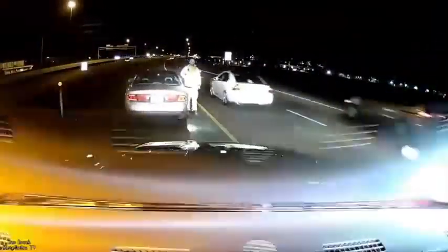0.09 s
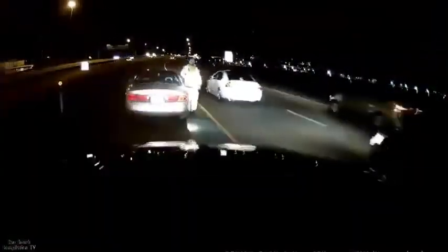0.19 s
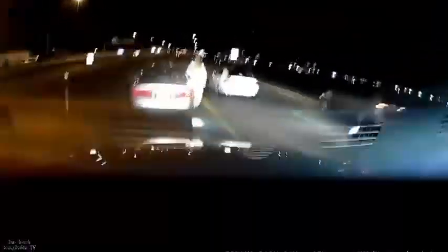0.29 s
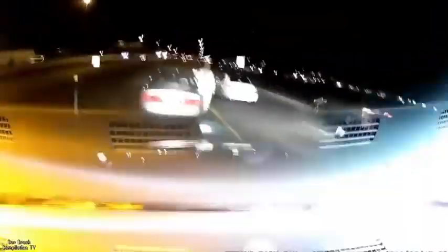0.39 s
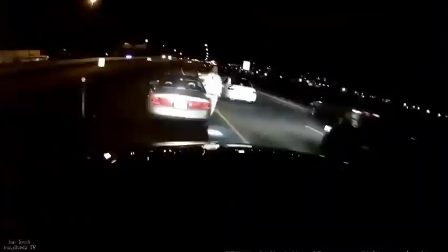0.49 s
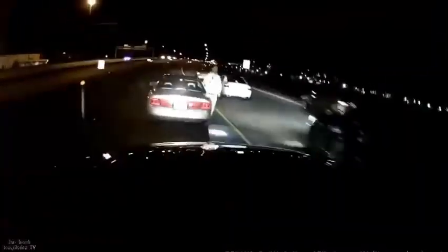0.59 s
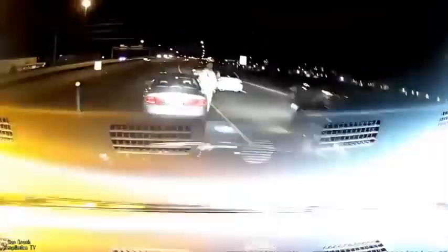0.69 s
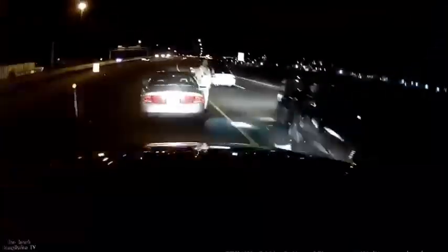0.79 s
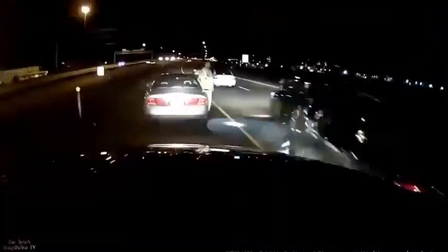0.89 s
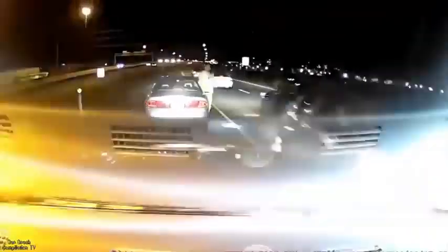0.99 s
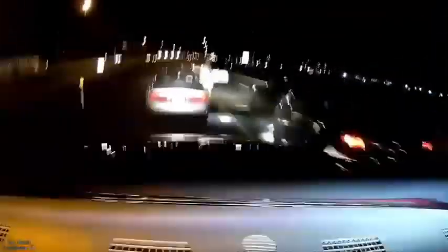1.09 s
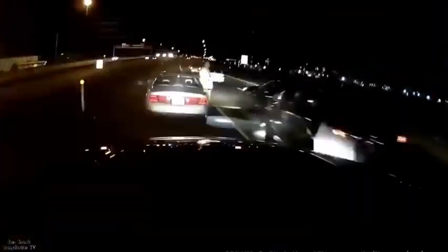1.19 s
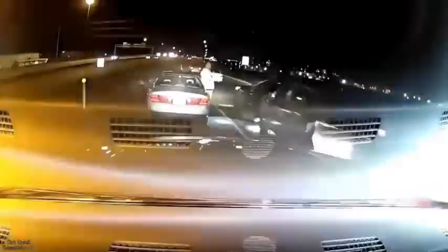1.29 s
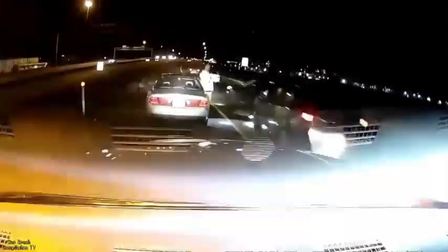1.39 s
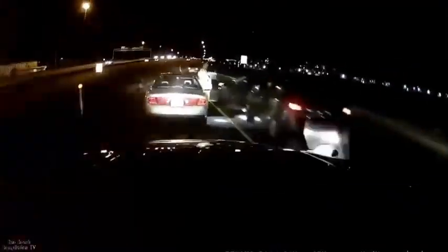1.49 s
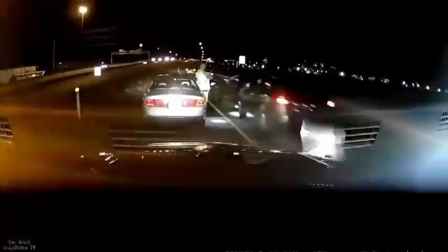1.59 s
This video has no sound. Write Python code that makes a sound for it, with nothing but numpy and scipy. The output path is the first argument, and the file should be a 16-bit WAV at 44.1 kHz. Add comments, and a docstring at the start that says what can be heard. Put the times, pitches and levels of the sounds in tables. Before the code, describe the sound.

A car collision from inside the cabin. Quiet road noise with unsteady hum and faint whine; a short scuff at 0.2 seconds, then a massive, clipped boom and crumpling metal from 0.24 to 0.6, heaviest around 0.4 to 0.5. Faint glass clinks near 0.7, scattered knocks, sharp bright cracks around 0.97 to 1.05, dry clatter until 1.5, and a wavering tyre squeal from 1.3, stronger at 1.54 to the end.

```python
"""Road noise with an unsteady hum and a faint whine is heard first inside a car; then a short scuff begins a collision.
The body booms as filtered noise and pressure pulses, and its panels crumple as dense grains of noise.
Loose parts knock and trim cracks as coloured noise bursts; struck parts and glass chips ring as damped sines.
A tyre squeals late on as a wavering tone with its octave. The loud parts overload the microphone input."""
import sys
import numpy as np
from scipy import signal
from scipy.fft import rfft, irfft, next_fast_len
from scipy.io import wavfile
from scipy.ndimage import map_coordinates

SR = 44100
rng = np.random.default_rng(int(sys.argv[2]) if len(sys.argv) > 2 else 0)


def dump(signal):
    """Clip the signal to [-1, 1] and save it as 16-bit WAV at the path in sys.argv[1]."""
    limited = np.clip(np.atleast_2d(signal).T, -1, 1)
    pcm = np.round(limited * 32767).astype(np.int16)
    wavfile.write(sys.argv[1], SR, pcm)


N = 72765

# Spectrum of the road noise: frequency_hz, gain_db
ROAD_SPECTRUM = [(15, -45), (25, 0.5), (120, -17.5), (185, 0.5), (320, -9.5), (640, -15.5), (734, -11),
                 (887, -11.5), (1500, -13), (2100, -26.5), (2800, -18.5), (3300, -28), (16000, -59.5)]
ROAD_DB, ROAD_FADE_DB_PER_S, ROAD_WOBBLE_DB = -31.5, 1.35, 1.5
HUM_HZ, HUM_DB, HUM_WAVER, HUM_WOBBLE_DB = 725, -45.5, 0.009, 7.1  # waver: fraction of the pitch
WHINE_HZ, WHINE_DB = 7200, -63

# Level of the tyre squeal's fundamental: time_s, level_db
SQUEAL_LEVEL = [(1.24, -69), (1.29, -38), (1.45, -42), (1.52, -42), (1.538, -30.5), (1.65, -32)]
SQUEAL_HZ, OCTAVE_DB = 805, -3
SQUEAL_WAVER, SQUEAL_FLUTTER_DB = 0.009, 1.5  # waver: fraction of the pitch

# First touch of the bumpers: start_s, level_db, hold_s
SCUFFS = [(0.2033, -22, 0.011), (0.215, -26.5, 0.015)]
# Spectrum of the scuff: frequency_hz, gain_db
SCUFF_SPECTRUM = [(290, -37), (500, -6), (622, -23), (766, -14), (1330, 2), (2010, -15), (2510, -9),
                  (6000, -63)]

# Glass chips: start_s, level_db, pitch_hz
GLASS_CLINKS = [(.708, -46, 11600), (.712, -48, 14300), (.725, -44, 10700), (1.57, -43.5, 3170)]
# Ringing of struck parts, low thumps and one higher ring from a crack: start_s, level_db, pitch_hz
STRUCK_RINGS = [(.2425, -7, 273), (.402, 4, 260.4), (.977, -11, 1645), (.92, -16.5, 471),
                (.976, -16.5, 200), (1.088, -14.5, 201.4), (1.095, -19.5, 122), (1.228, -23, 530)]
CLINK_T60_S, STRUCK_T60_S = 0.16, 0.11

# Loose parts knocking, upper mids and treble relative to the peak level:
# start_s, peak_db, ring_hz, upper_mids_db, treble_db, hold_s
LOOSE_KNOCKS = [(0.24, -5.5, 770, -23.5, -49, 0.011), (0.305, -5, 1080, -24.5, -41, 0.012),
                (0.397, 2.5, 1470, -47, -59, 0.039), (0.43, -2.5, 1000, -34, -50, 0.015),
                (0.458, -4, 1350, -37, -52, 0.0099), (0.554, -13.5, 920, -13.5, -34, 0.0066),
                (0.675, -12, 1060, -15.5, -23, 0.015), (0.686, -11.5, 820, -19, -27, 0.023),
                (0.777, -12.5, 1010, -29.5, -37, 0.016), (0.809, -13.5, 900, -20.5, -48, 0.0087),
                (0.889, -27, 2980, -10, -7.5, 0.0072), (0.906, -14, 664, -13.5, -13, 0.0087),
                (0.959, -10.5, 1000, -12.5, -26, 0.0092), (1.003, -16.5, 3160, -5.5, -12, 0.025),
                (1.093, -9, 700, -22.5, -46, 0.0057), (1.144, -20.5, 1540, -9.5, -22, 0.0049),
                (1.158, -8.5, 920, -17.5, -28.5, 0.0087), (1.172, -11.5, 3120, -12, -22.5, 0.0072),
                (1.185, -9, 1770, -12.5, -24.5, 0.012), (1.189, -9, 520, -14, -31, 0.0065),
                (1.208, -14.5, 1670, -14.5, -31, 0.011), (1.247, -12.5, 1720, -15.5, -28, 0.0088),
                (1.265, -15.5, 3600, -7, -21, 0.0012), (1.272, -26, 780, -1, -22, 0.017),
                (1.296, -18.5, 1630, -16, -30, 0.019), (1.349, -9.5, 1470, -16.5, -28, 0.011),
                (1.363, -22.5, 2960, -11.5, -17.5, 0.021), (1.422, -10, 1580, -19, -47, 0.0038),
                (1.429, -8, 1035, -29, -53, 0.0092), (1.459, -21.5, 1700, -24, -49, 0.019),
                (1.492, -14.5, 990, -21.5, -43, 0.018), (1.556, -33.5, 3220, -27, -11, 0.01)]
# Spectrum of the dull layer of a knock: frequency_hz, gain_db
KNOCK_DULL_SPECTRUM = [(250, -10), (600, -2), (1700, -8), (2200, -22), (16000, -76)]
# Spectrum of its upper mids: frequency_hz, gain_db
KNOCK_MIDS_SPECTRUM = [(1700, -4.5), (2400, 9.5), (5500, 3.5), (6500, -20), (16000, -53)]
# Spectrum of its treble: frequency_hz, gain_db
KNOCK_TREBLE_SPECTRUM = [(4500, -2), (6500, -2.5), (14000, -4.5), (16400, -26)]
KNOCK_ATTACK_S, KNOCK_T60_S = 0.001, 0.03
CREST_DB = 11  # peak over rms of a knock
RING_Q, KNOCK_RING_DB = 5, 4
CLATTER_DB, CLATTER_PER_S = 3, 1200

# Trim cracking near the microphone: start_s, level_db, ring_hz, hold_s
TRIM_CRACKS = [(.9512, -23, 5300, .001), (.9742, -3, 4000, .0065), (.983, -12, 2500, .004),
               (.991, -5, 4900, .005), (1.0065, -17, 7500, .002), (1.017, -19, 6500, .002),
               (1.0242, -12, 5500, .002), (1.0482, -7, 7200, .003), (1.0555, -13, 5300, .001)]
# Spectrum of a crack: frequency_hz, gain_db
CRACK_SPECTRUM = [(200, 6), (500, 0.5), (1670, -1), (2000, -9), (3000, -4), (5500, -3), (10000, 0),
                  (15400, -7), (16300, -33)]
CRACK_ATTACK_S, CRACK_T60_S = 0.0008, 0.011
CRACK_RING_GAIN = 2 * 10 ** (-2 / 20)

# Shaking of the body: time_s, level_db
BOOM_LEVEL = [(0.25, -8.5), (0.326, -7), (0.6, -12), (0.84, -25), (0.87, -30.5), (0.998, -21),
              (1.032, -36.5), (1.528, -33), (1.578, -65), (1.65, -35)]
# Spectrum of the shaking: frequency_hz, gain_db
BOOM_SPECTRUM = [(8.8, -9), (15, -2), (70, -6.5), (161, -18), (200, -14.5), (260, -70)]
# Largest pressure heaves of the cabin: start_s, peak_pressure (signed, linear), length_s
CABIN_HEAVES = [(0.2412, -1.17, 0.0047), (0.246, 0.25, 0.022), (0.308, 1.2, 0.01), (.316, -1.3, 0.007),
                (0.346, -1.7, 0.011), (0.409, 1, 0.014), (.416, 1.2, .017), (.484, -.9, .01),
                (.5, -2.6, .016), (.542, 2, .015), (.572, -.85, .021), (.618, .55, .012), (.697, -.4, .03),
                (.727, .4, .044)]
BOOM_RISE_S = 0.008

# Panels crumpling: time_s, thud_db, crunch_db
CRUMPLE_LEVELS = [(0.243, -17.5, -21), (0.349, -17.5, -25.5), (0.4, -7, -12.5), (0.48, -9.5, -13.5),
                  (0.511, -32.5, -21), (0.589, -17, -23.5), (0.651, -41, -32)]
# The wreck sliding and settling: time_s, thud_db, crunch_db
SETTLE_LEVELS = [(0.68, -37.5, -32), (0.778, -36, -31), (1.046, -31, -24), (1.15, -31, -33),
                 (1.462, -64, -32.5), (1.65, -54, -66)]
# Spectrum of the thud: frequency_hz, gain_db
THUD_SPECTRUM = [(71, -55), (120, 8), (162, -4), (264, 3.5), (700, -13), (910, -96)]
# Spectrum of the crunch: frequency_hz, gain_db
PANEL_SPECTRUM = [(290, -4.5), (500, -3), (1600, -7), (2010, -15.5), (5090, -22), (6610, -36.5),
                  (12100, -36.5), (16000, -50)]
GRAINS_PER_S, GRAIN_SPREAD_DB, GRAIN_T60_S = 1500, 2.5, 0.0094

CLIP_TOP, CLIP_HARD = 1.0, 8  # ceiling of the input, sharpness of its knee
SAG_HZ, TOP_HZ, FULL_SCALE = 3.26, 16400, 0.97


def amp(db):
    """Decibels to an amplitude ratio."""
    return 10 ** (np.asarray(db) / 20)


def unit(x):
    """Normalisation to an rms of 1."""
    return x / np.sqrt(np.mean(x ** 2) + 1e-20)


def gain(spectrum, hz):
    """Amplitude response, interpolated in decibels over log frequency."""
    f, db = np.transpose(spectrum)
    return amp(np.interp(np.log(hz + 1), np.log(f + 1), db))


def curves(rows):
    """Amplitude envelopes, one for each dB column; at -120 dB outside the rows."""
    s, *columns = np.transpose(rows)
    return [amp(np.interp(np.arange(N) / SR, s, db, -120, -120)) for db in columns]


def wobble(rate):
    """Band-limited random fluctuation: a smooth curve through rate random knots a second."""
    knots = rng.standard_normal(int(N * rate / SR) + 4)
    return map_coordinates(knots, [np.arange(N) * rate / SR])


def wavering_phase(hz, waver, rate):
    """Frequency modulation: phase is the running sum of a wobbling frequency."""
    return 2 * np.pi * np.cumsum(hz * (1 + waver * wobble(rate))) / SR


def filtered(x, response):
    """Linear filtering: the spectrum is multiplied by a response of frequency."""
    m = next_fast_len(len(x) + 8192)
    spectrum = rfft(x, m) * response(np.fft.rfftfreq(m, 1 / SR))
    return irfft(spectrum, m)[:len(x)]


def coloured(x, spectrum):
    """Spectral shaping, with the result brought to an rms of 1."""
    return unit(filtered(x, lambda f: gain(spectrum, f)))


def resonance(f, hz, q):
    """Second-order resonance with unit gain at its centre."""
    damping = 1j * f * hz / q
    return damping / (hz * hz - f * f + damping)


def burst(level_db, hold, attack, t60, response):
    """Impact noise: filtered noise under a linear attack, a hold and an exponential decay."""
    t = np.arange(SR // 10) / SR
    decay = amp(-60 * np.maximum(t - hold, 0) / t60)
    envelope = np.minimum(t / attack, 1) * decay
    return amp(level_db) * envelope * unit(filtered(rng.standard_normal(len(t)), response))


def add(track, s, sound):
    """Superposition of a sound on the track at time s."""
    part = track[round(s * SR):][:len(sound)]
    part += sound[:len(part)]


def road():
    """Broadband noise that fades slowly, with a frequency-modulated hum and a steady sine whine."""
    t = np.arange(N) / SR
    level_db = ROAD_DB - ROAD_FADE_DB_PER_S * t + ROAD_WOBBLE_DB * wobble(15.05)
    hiss = amp(level_db) * coloured(rng.standard_normal(N), ROAD_SPECTRUM)
    hum_level = amp(HUM_DB + HUM_WOBBLE_DB * wobble(9.8))
    hum = hum_level * np.sin(wavering_phase(HUM_HZ, HUM_WAVER, 60))
    whine = amp(WHINE_DB) * np.sin(2 * np.pi * WHINE_HZ * t)
    return hiss + hum + whine


def squeal():
    """Tyre slip at a wavering rate: a modulated fundamental and its octave."""
    phase = wavering_phase(SQUEAL_HZ, SQUEAL_WAVER, 90)
    tone = np.sin(phase) + amp(OCTAVE_DB) * np.sin(2 * phase)
    flutter = amp(SQUEAL_FLUTTER_DB * wobble(59.7))
    return curves(SQUEAL_LEVEL)[0] * flutter * tone


def scuff():
    """Scraping contact before the blow: short bursts of mid-pitched noise."""
    out = np.zeros(N)
    for s, db, hold in SCUFFS:
        add(out, s, burst(db, hold, KNOCK_ATTACK_S, KNOCK_T60_S, lambda f: gain(SCUFF_SPECTRUM, f)))
    return out


def rings(rows, t60, rough):
    """Modal decay: one damped sine for each row, its phase drifting as a random walk."""
    out, t = np.zeros(N), np.arange(SR // 8) / SR
    for s, db, hz in rows:
        drift = rough * np.cumsum(rng.standard_normal(len(t)))
        envelope = amp(db - 60 * t / t60) * (1 - np.exp(-t / 0.00034))
        add(out, s, envelope * np.sin(2 * np.pi * hz * t + drift))
    return out


def clinks():
    """Short-lived vibration of glass chips, each as one damped mode."""
    return rings(GLASS_CLINKS, CLINK_T60_S, rough=0.058)


def struck_rings():
    """Modal decay of struck parts: low thumps and one higher ring from a crack, one damped mode each."""
    return rings(STRUCK_RINGS, STRUCK_T60_S, rough=0.04)


def knocks():
    """Impact excitation of loose parts: resonant dull noise, upper mids and treble under a fast clatter."""
    out = np.zeros(N)
    for s, db, hz, mids_db, treble_db, hold in LOOSE_KNOCKS:
        def dull(f):
            ring = amp(KNOCK_RING_DB) * np.abs(resonance(f, hz, RING_Q)) ** 2
            return gain(KNOCK_DULL_SPECTRUM, f) + ring
        layers = ((db - CREST_DB, dull),
                  (db + mids_db, lambda f: gain(KNOCK_MIDS_SPECTRUM, f)),
                  (db + treble_db, lambda f: gain(KNOCK_TREBLE_SPECTRUM, f)))
        for layer_db, response in layers:
            add(out, s, burst(layer_db, hold, KNOCK_ATTACK_S, KNOCK_T60_S, response))
    return out * unit(amp(CLATTER_DB * wobble(CLATTER_PER_S)))


def cracks():
    """Brittle cracking of stiff trim: abrupt bright noise, each burst with a resonance of its own."""
    out = np.zeros(N)
    for s, db, hz, hold in TRIM_CRACKS:
        def bright(f):
            return gain(CRACK_SPECTRUM, f) * (1 + CRACK_RING_GAIN * resonance(f, hz, RING_Q))
        add(out, s, burst(db, hold, CRACK_ATTACK_S, CRACK_T60_S, bright))
    return out


def body():
    """Random vibration of the body as low noise, with half-sine heaves of cabin pressure."""
    s, level_db = np.transpose(BOOM_LEVEL)
    t = np.arange(N) / SR
    rise = np.clip((t - CABIN_HEAVES[0][0]) / BOOM_RISE_S, 0, 1)  # starts with the first heave
    shaking = coloured(rng.standard_normal(N), BOOM_SPECTRUM)
    out = rise * amp(np.interp(t, s, level_db)) * shaking
    for start, pressure, length in CABIN_HEAVES:
        add(out, start, pressure * np.sin(np.pi * np.arange(round(length * SR)) / (length * SR)))
    return out


def grains():
    """Buckling as a random pulse train: decaying grains of scattered size modulate noise."""
    struck = rng.random(N) < GRAINS_PER_S / SR
    hits = struck * amp(GRAIN_SPREAD_DB * rng.exponential(size=N))
    decay = amp(-60 * np.arange(400) / SR / GRAIN_T60_S)
    size = signal.fftconvolve(hits, decay)[:N]
    return (unit(size) + 1.3) * rng.standard_normal(N)  # 1.3: steady noise under the grains


def crumple():
    """Dense buckling grains filtered by thick panels (thud) and thin ones (crunch), then settling."""
    thud, crunch = curves(list(CRUMPLE_LEVELS) + list(SETTLE_LEVELS))
    thick = thud * coloured(grains(), THUD_SPECTRUM)
    flutter = amp(1.54 * wobble(40.21))
    return thick + crunch * flutter * coloured(grains(), PANEL_SPECTRUM)


def scene():
    """Superposition of all the sources, from the background to the crumpling."""
    background = road() + squeal()
    parts = scuff() + clinks() + struck_rings() + knocks() + cracks()
    return (background + parts + body() + crumple())[None]


def record(dry):
    """Saturation of the input, a high-pass sag of its flat tops, and a band limit."""
    x = dry[0]
    clipped = x / (1 + np.abs(x / CLIP_TOP) ** CLIP_HARD) ** (1 / CLIP_HARD)
    sagged = filtered(clipped, lambda hz: 1j * hz / (SAG_HZ + 1j * hz))
    limited = np.clip(sagged, -FULL_SCALE, FULL_SCALE)
    return filtered(limited, lambda hz: hz < TOP_HZ)[None]


dry = scene()
out = record(dry)
dump(out)
```